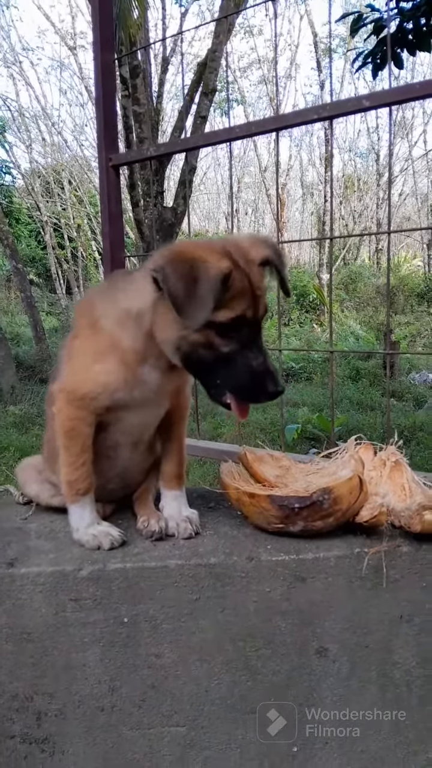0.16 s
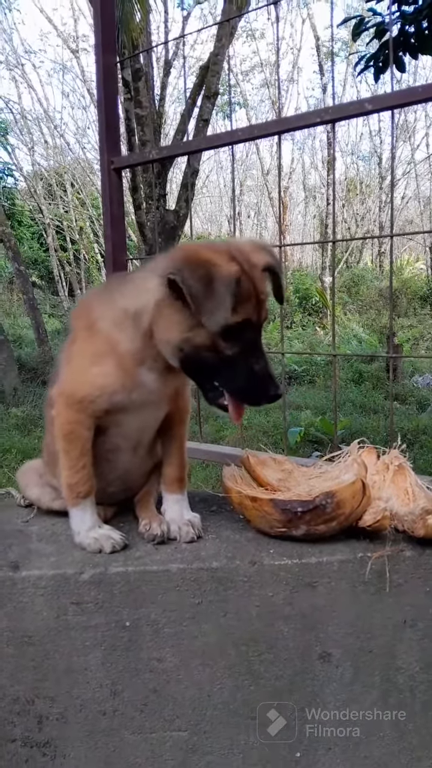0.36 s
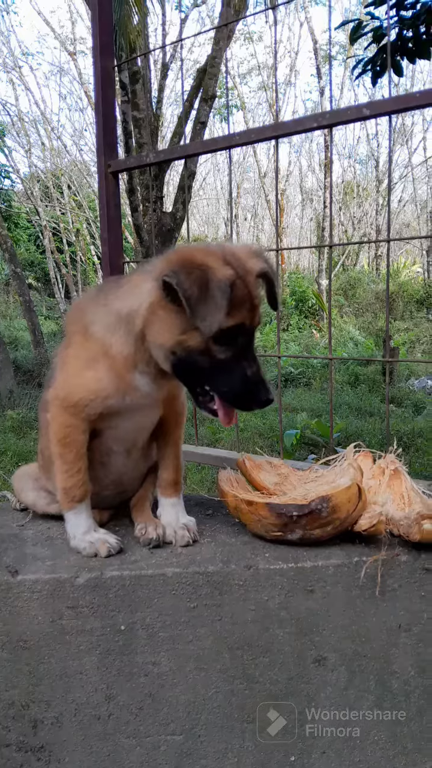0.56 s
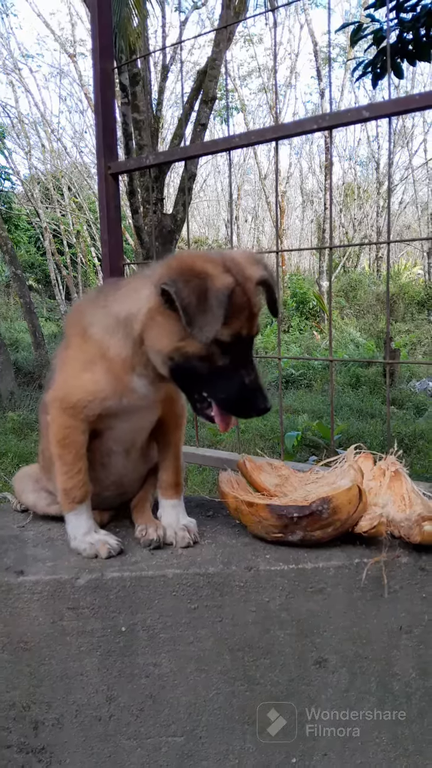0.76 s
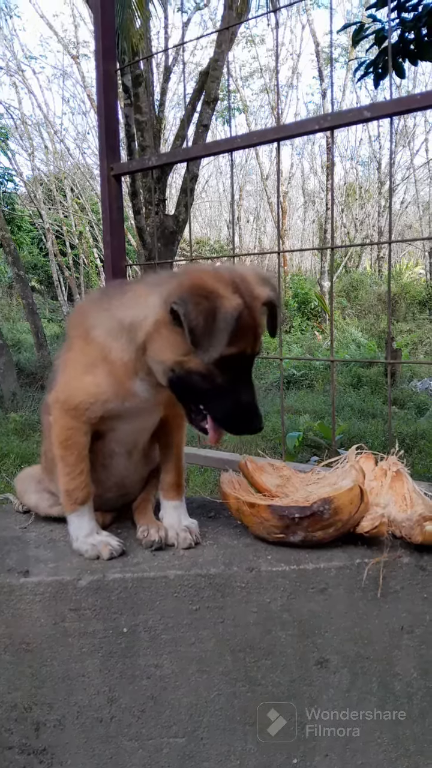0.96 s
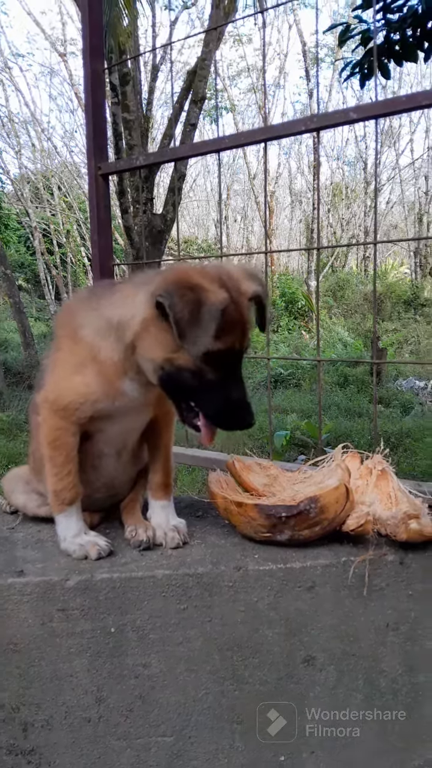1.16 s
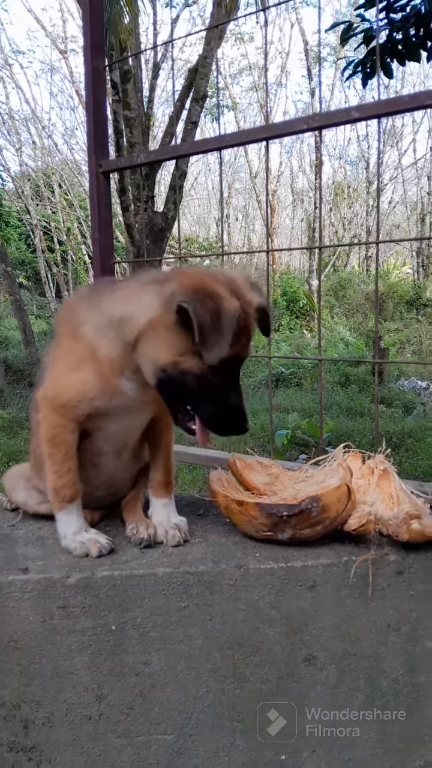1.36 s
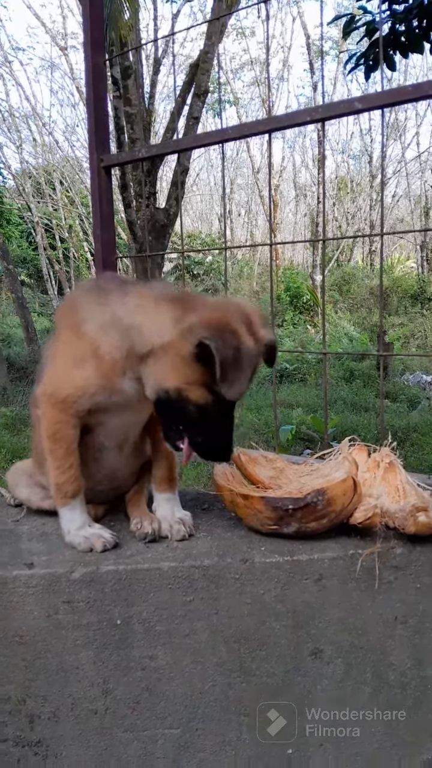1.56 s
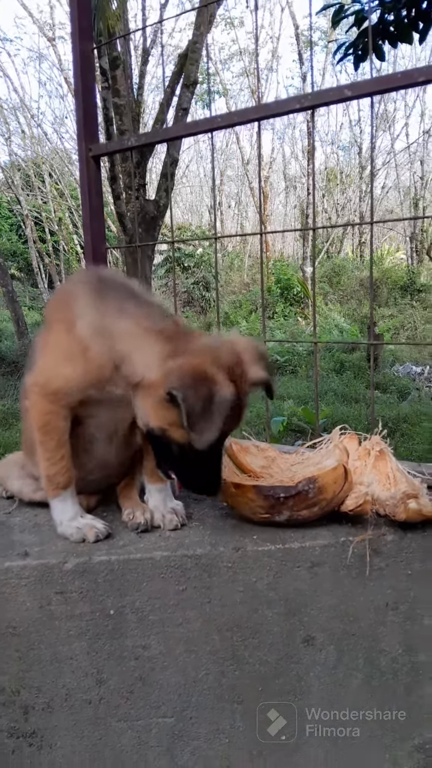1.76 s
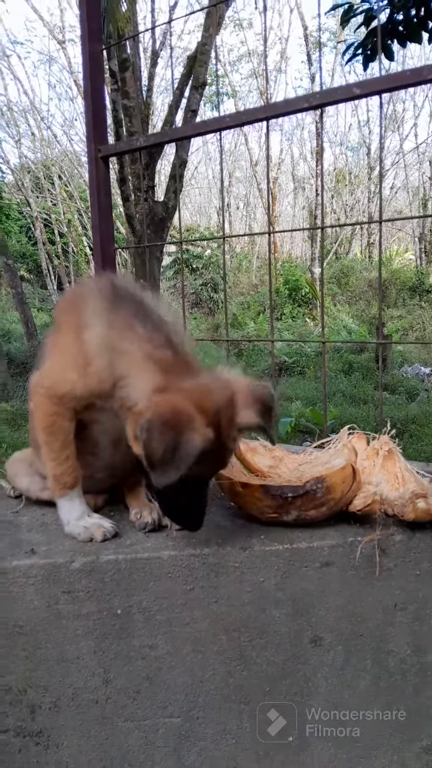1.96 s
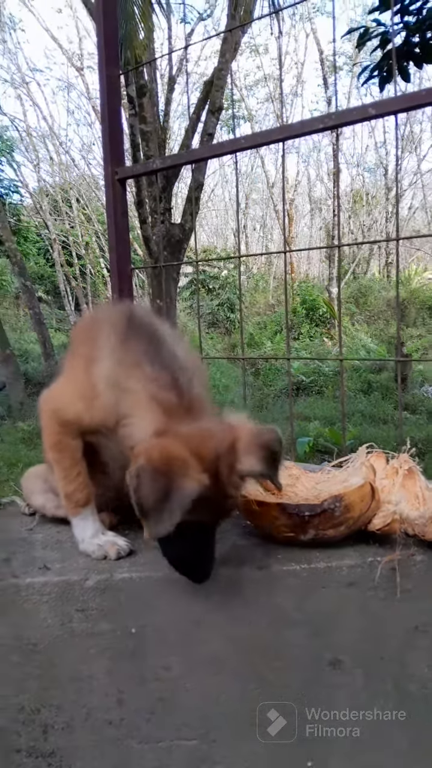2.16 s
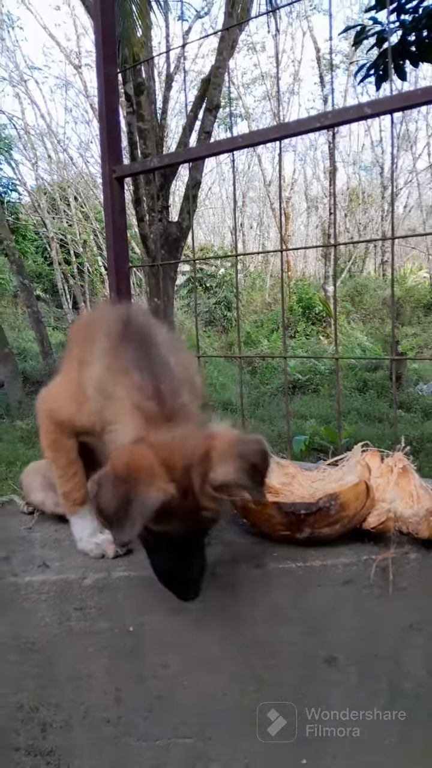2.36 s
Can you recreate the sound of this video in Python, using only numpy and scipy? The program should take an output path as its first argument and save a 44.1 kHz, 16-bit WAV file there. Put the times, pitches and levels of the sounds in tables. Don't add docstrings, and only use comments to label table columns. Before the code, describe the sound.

Two gritty scuffing footfalls thud on concrete, the first heavier, then a brief rough bird whistle rises on the left and echoes off trees. Tiny wet licks follow; quiet open yard, close stereo microphone, faint engine hum.

```python
import sys
import numpy as np
from scipy import signal
from scipy.fft import rfft, irfft
from scipy.io import wavfile

SR = 44100
rng = np.random.default_rng(int(sys.argv[2]) if len(sys.argv) > 2 else 0)


def field_ratio(decibels):
    return 10 ** (np.asarray(decibels, dtype=float) / 20)


def log_audio(samples):
    frames = np.atleast_2d(samples).T
    limited = np.clip(frames, -1, 1)
    pcm = np.round(limited * 32767).astype(np.int16)
    wavfile.write(sys.argv[1], SR, pcm)


N = 110250


def rms_one(x):
    return x / np.sqrt(np.mean(x ** 2) + 1e-20)


def in_time(rows):
    times_s, *columns = np.transpose(rows)
    return [np.interp(np.arange(N) / SR, times_s, column) for column in columns]


def at_hz(points, hz):
    points = np.array(points)
    return np.interp(np.log(hz), np.log(points[:, 0] + 1), points[:, 1])


def pan(db):
    return field_ratio([[db / 2], [-db / 2]])


def lag(x, seconds):
    left = np.interp(np.arange(N) - seconds * SR, np.arange(N), x[0])
    return np.array([left, x[1]])


def drift(rate_hz):
    r = np.exp(-80 * np.pi * rate_hz / SR)
    noise = rng.standard_normal(N // 40 + 2002)
    slow = signal.lfilter([1], [1, -2 * r, r * r], noise)[2000:]
    return np.interp(np.arange(N) / 40, np.arange(len(slow)), rms_one(slow))


def flutter(hz):
    sos = signal.butter(2, hz, fs=SR, output="sos")
    return rms_one(signal.sosfilt(sos, rng.standard_normal(N)))


def resonance(x, hz, width_hz):
    r = np.exp(-np.pi * width_hz / SR)
    poles = [1, -2 * r * np.cos(2 * np.pi * hz / SR), r * r]
    return signal.lfilter([(1 - r * r) / 2, 0, (r * r - 1) / 2], poles, x + 1e-18)


def colour(x, spectrum):
    hz = np.fft.rfftfreq(N, 1 / SR) + 1
    low_fall = np.clip(hz / spectrum[0][0], 0, 1) ** 2
    return rms_one(irfft(rfft(x) * field_ratio(at_hz(spectrum, hz)) * low_fall, N))


def echoes(x, t60_s):
    t = np.arange(SR) / SR
    tail = rng.standard_normal((2, SR)) * field_ratio(-60 * t / t60_s) * (t > .008)
    tail = tail / np.sqrt(np.sum(tail ** 2) / 2)
    return signal.fftconvolve(x[None], tail, axes=1)[:, :N]


def glides(rows):
    out, t = np.zeros(N), np.arange(N) / SR
    for start_s, length_s, level_db, from_hz, to_hz in rows:
        u = np.clip((t - start_s) / length_s, 0, 1)
        hz = to_hz + (from_hz - to_hz) * (1 - u) ** 1.5
        swell = np.sin(np.pi * u) ** .5 * (u < 1)
        out += field_ratio(level_db + 4.5) * swell * np.sin(2 * np.pi * np.cumsum(hz) / SR)
    return out


def thuds():
    # start_s, level_db, ring_hz, t60_s
    landings = [(.2378, -16, 131.4, 0.061), (0.246, -17, 71.3, 0.15), (0.2853, -25, 161, 0.061),
                (0.444, -36, 107, 0.093), (.454, -48.5, 594.7, 0.32), (.468, -48, 580, 0.21),
                (0.482, -36, 66.8, .3), (0.4929, -40, 71.3, 0.23), (0.517, -36.5, 94, 0.11),
                (1.068, -51, 45, 0.14), (1.269, -52.5, 54.3, 0.33), (1.891, -51, 56.22, 0.44),
                (1.978, -51, 55, 0.18), (2.32, -42.5, 46.6, 0.19), (2.334, -47.5, 109, 0.15)]
    out, t = np.zeros(N), np.arange(N) / SR
    for start_s, level_db, ring_hz, t60_s in landings:
        u = np.maximum(t - start_s, 0)
        onset = 1 - np.exp(-u / .0017)
        out += field_ratio(level_db - 60 * u / t60_s) * np.sin(2 * np.pi * ring_hz * u) * onset
    return out


def scuffs():
    # time_s, sole_db, grit_db (relative to sole)
    pressure = [
        [(.214, -99, -11), (.221, -50.5, -0.5), (.237, -39.5, 1), (.254, -48.5, 2.5), (.274, -46.5, -4),
         (.286, -41.5, -11), (.3, -49.5, 0), (.336, -62.5, -3), (.4, -74.5, 0)],
        [(.41, -73.5, 0), (.45, -60.5, -1), (.473, -50, -3), (.498, -58, 0), (.512, -55, 1.5), (.544, -65.5, 4),
         (.575, -63.5, 1), (.62, -76, -2)],
    ]
    # centre_hz, width_hz, level_db
    sole_modes = [(354, 93, -1.5), (580, 92, -0.5), (780, 110, 0.5), (1053, 140, -2.5), (1233, 75, -3),
                  (1468, 98, 2), (1970, 230, -17), (2645, 93, -7.5)]
    # frequency_hz, level_db (per Hz)
    grit_spectrum = [(2500, -1), (5650, -12), (9000, -11), (15700, -17)]
    grains_per_s, spread_db, clump_db, side_db = 2200, 2.5, 1.5, -10
    sizes = field_ratio(spread_db * np.minimum(rng.exponential(1, (2, N)), 4))
    grains = sizes * rng.standard_normal((2, N)) * (rng.random(N) < grains_per_s / SR)
    grains = grains + 0.23 * rng.standard_normal((2, N))
    grains = grains[0] + field_ratio(side_db) * grains[1] * [[1], [-1]]
    clumped = grains * field_ratio(clump_db * drift(61))
    sole = 0
    for k, (hz, width_hz, db) in enumerate(sole_modes):
        sole = sole + field_ratio(db) * (-1) ** k * resonance(clumped, hz, width_hz)
    sole = rms_one(sole)
    grit, out = colour(grains, grit_spectrum), 0
    for rows in pressure:
        faded = [(rows[0][0] - .01, -120, 0), *rows, (rows[-1][0] + .01, -120, 0)]
        sole_db, grit_db = in_time(faded)
        out = out + field_ratio(sole_db) * (sole + field_ratio(grit_db) * grit)
    return out


def ticks():
    # start_s, level_db (peak), centre_hz, width_hz
    snaps = [(.233, -32.5, 5500, 1800), (0.26, -42, 4300, 2300), (0.284, -39, 2800, 3900),
             (.298, -34.5, 1380, 530), (.299, -34, 2570, 920), (0.24, -33, 3000, 730),
             (.346, -60, 850, 1500), (.58, -62, 850, 1200), (.473, -37.5, 4900, 13000),
             (.507, -51, 8000, 8000), (0.568, -51, 5800, 2980), (0.623, -48, 14000, 2980),
             (.841, -43, 6400, 3300), (.2215, -31.5, 1400, 310), (.2805, -39, 900, 500),
             (0.453, -47, 1430, 300), (0.4865, -40.5, 1420, 270), (.513, -38, 676, 230),
             (1.169, -57.5, 900, 900), (2.334, -52, 990, 1020), (.2215, -34.5, 730, 270),
             (.23, -33, 1450, 210), (.2355, -29.5, 1400, 370), (.235, -37, 1000, 220),
             (.241, -35, 1000, 350), (.249, -31.5, 1430, 430), (.288, -42, 2100, 500),
             (.302, -44, 820, 320), (.446, -44.5, 630, 230), (.461, -46, 585, 130), (.47, -41, 1130, 460),
             (.471, -44.5, 1380, 190), (.479, -47, 1550, 440), (.492, -46, 1500, 300),
             (.489, -43.5, 1660, 250), (.526, -59, 1350, 350), (.512, -37, 3400, 1300),
             (.39, -51, 5300, 2800), (1.742, -53, 11000, 12000), (1.81, -77, 5000, 6000)]
    length = 900
    out = np.zeros((2, N + length))
    decay = np.exp(-np.arange(length) / SR / .0015)
    for start_s, level_db, hz, width_hz in snaps:
        burst = rng.standard_normal((2, length))
        tick = (.5 * burst + burst[0]) * decay
        tick = resonance(resonance(tick, hz, width_hz), hz, width_hz)
        start = int(start_s * SR)
        out[:, start:start + length] += field_ratio(level_db) * tick / np.abs(tick).max()
    return out[:, :N]


def near_bird():
    # time_s, pitch_hz, level_db, breath_db, second_partial_db
    whistle = [
        (.764, 3450, -66, -64, -71),
        (.776, 3980, -59, -63, -67),
        (.789, 4650, -51, -63, -69),
        (.797, 4760, -47, -63, -74),
        (.803, 4780, -56, -63, -78),
        (.812, 4840, -44, -63, -78),
        (.827, 4935, -38, -63, -74),
        (.846, 4935, -36, -64, -67),
        (.851, 4820, -53, -66, -66),
    ]
    # frequency_hz, level_db (per Hz)
    breath_spectrum = [(1800, -9), (3000, -8), (3700, -3), (4500, 4), (5700, 4), (7800, 3), (9800, -3),
                       (15500, -8)]
    lead_in = [(0, 3000, -130, -130, -130), (.735, 3200, -120, -85, -110), (.753, 3300, -100, -64, -78)]
    release = [(.872, 4600, -64, -71, -73), (.95, 4500, -200, -110, -200)]
    hz, level_db, breath_db, second_db = in_time([*lead_in, *whistle, *release])
    phase = 2 * np.pi * np.cumsum(hz * (1 + .003 * drift(60))) / SR
    first_db = level_db + 3 + drift(40.3)
    third_db = -67 + .8 * (level_db + 40) - 20 * (hz < 4500)
    tone = 0
    for k, (db, rasp) in enumerate(zip((first_db, second_db, third_db), (.15, 1.5, 1.1)), 1):
        tone = tone + field_ratio(db) * (1 + rasp * flutter(130 * k)) * np.sin(k * phase)
    breath = field_ratio(breath_db) * colour(rng.standard_normal(N), breath_spectrum)
    direct = tone * pan(13.5) + breath * pan(8.9)
    direct = lag(direct[::-1], .0001)[::-1]
    bush_db = 4 + np.interp(hz, (4550, 4930), (0, -15))
    scatter = field_ratio(-6) * echoes(tone, t60_s=0.42) + echoes(tone * field_ratio(bush_db), t60_s=.22)
    return direct + pan(4) * scatter + field_ratio(2) * echoes(breath, t60_s=0.2)


def far_birds():
    # start_s, length_s, level_db, from_hz, to_hz
    calls = [(-.05, 0.088, -67, 5740, 5840), (-.05, 0.13, -71.5, 6390, 6120),
             (.147, 0.024, -64, 6190, 5940), (.164, 0.043, -68, 5950, 5850),
             (.735, 0.035, -64.5, 4790, 4710), (2.224, 0.036, -77, 5870, 4970),
             (2.24, 0.075, -83, 4970, 4920), (2.25, .1, -86, 6140, 5700), (2.27, 0.038, -80, 5800, 4970),
             (2.32, 0.036, -80.5, 5900, 4930), (2.44, 0.031, -80, 5750, 5190),
             (2.462, .026, -77, 5130, 5150)]
    notes = glides(calls) * (.6 + flutter(200))
    return 0.58 * notes * pan(13.3) + echoes(notes, t60_s=0.3)


def wet_licks():
    # start_s, length_s, level_db, from_hz, to_hz
    bubbles = [
        (.832, 0.027, -71.5, 1120, 974),
        (.878, 0.015, -67, 425, 600),
        (.895, 0.023, -64, 620, 854),
    ]
    return glides(bubbles) * (1 + .5 * flutter(88))


def engine():
    # time_s, firing_hz, level_db, third_order_db (relative to level)
    run = [(0, 54.28, -66.5, -21), (.35, 54.43, -57.5, 1.5), (.75, 54.13, -59, -26), (.95, 53.78, -69, -18),
           (1.3, 54.98, -71.5, -10), (1.55, 55.1, -62, -6), (1.9, 56.19, -64.5, -5.5), (2.2, 56.22, -72, 1),
           (2.5, 57.8, -65.5, -6)]
    orders_db = (-9, 3, -1.5, -21.5, -15.5, -19.5)
    hz, level_db, third_db = in_time(run)
    phase = 2 * np.pi * np.cumsum(hz) / SR
    levels = [level_db.mean(), level_db, level_db + third_db] + [level_db.mean()] * 3
    out = 0
    for k, (level, trim_db) in enumerate(zip(levels, orders_db), 1):
        gain = field_ratio(level + 1 + trim_db + 2.5 * drift(3.1))
        out = out + gain * np.sin(k * phase + 6 * rng.random())
    return out


def air():
    # frequency_hz, level_db (per Hz)
    air_spectrum = [(20, -36), (40, -0.5), (110, -6), (200, -16.5), (400, -23), (1400, -31.5),
                    (2200, -34.5), (6500, -38.5), (15800, -37.5)]
    # frequency_hz, likeness (0 to 1)
    likeness = [(60, 0.69), (110, 0.34), (380, 0.46), (1300, 0.19), (2500, 0)]
    # time_s, level_db
    stir = [
        (0, 2),
        (.5, 8),
        (.9, 2.5),
        (1.2, 0),
        (1.8, -0.5),
        (2.5, 0.5),
    ]
    edges = 20 * 2 ** np.arange(0, 10.1, .5)
    white = rng.standard_normal((2, 2, N + 9000))
    out = 0
    for k, (low, high) in enumerate(zip(edges, edges[1:])):
        sos = signal.butter(2, [low, high], "band", fs=SR, output="sos")
        mid, side = signal.sosfilt(sos, white[k % 2])[:, 9000:]
        hz = np.sqrt(low * high)
        alike = np.clip(at_hz(likeness, hz), 0, .995)
        stereo = np.sqrt(1 + alike) * mid + np.sqrt(1 - alike) * side * [[1], [-1]]
        out = out + field_ratio(at_hz(air_spectrum, hz) + 0.5 * drift(7.2)) * stereo
    return field_ratio(in_time(stir)[0]) * field_ratio(-63.5) * rms_one(out)


def insects():
    # low_hz, high_hz, level_db
    bands = [
        (7050, 7400, -86),
        (7320, 10450, -77),
        (10410, 10900, -80.5),
        (1194, 1380, -85.5),
    ]
    out = 0
    for low_hz, high_hz, level_db in bands:
        sos = signal.butter(4, [low_hz, high_hz], "band", fs=SR, output="sos")
        band = rms_one(signal.sosfilt(sos, rng.standard_normal((2, N))))
        out = out + field_ratio(level_db + drift(22.8)) * band
    return out


def scene():
    steps = thuds() + lag((scuffs() + ticks()) * pan(-2), .00015)
    birds = near_bird() + far_birds()
    yard = (engine() + air()) * pan(1.5)
    return steps + birds + wet_licks() + yard + insects() * pan(6)


def band_limit(x):
    return signal.sosfilt(signal.butter(12, 15890, fs=SR, output="sos"), x)


def record(dry):
    mix = dry
    for low_cut_hz in (38, 27):
        mix = signal.sosfilt(signal.butter(2, low_cut_hz, "high", fs=SR, output="sos"), mix)
    mix = signal.sosfilt(signal.ellip(12, 1, 70, 15850, fs=SR, output="sos"), mix)
    return band_limit(mix)


dry = scene()
out = record(dry)
log_audio(out)
```